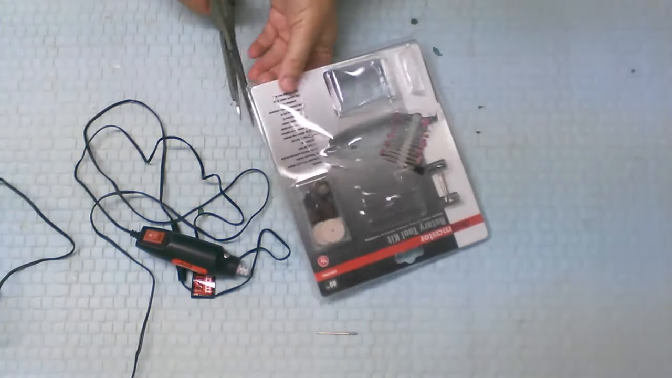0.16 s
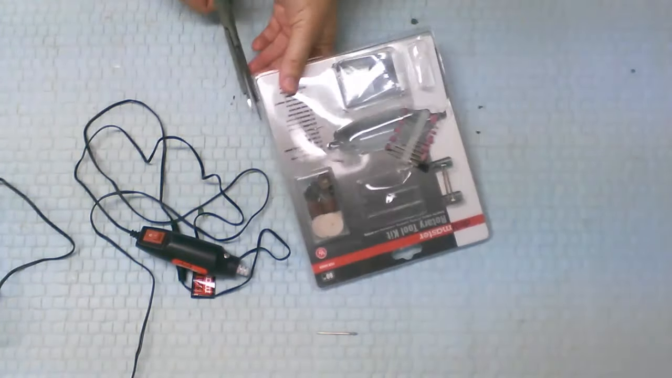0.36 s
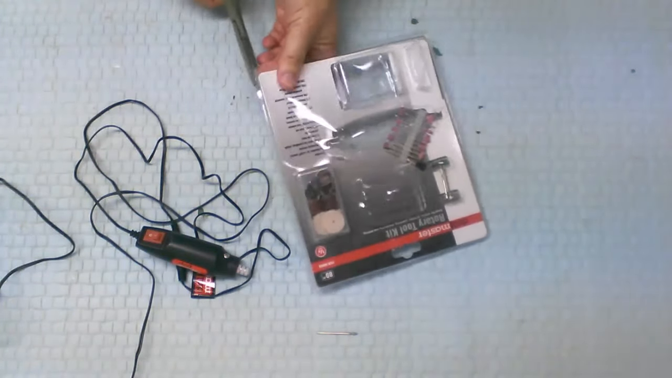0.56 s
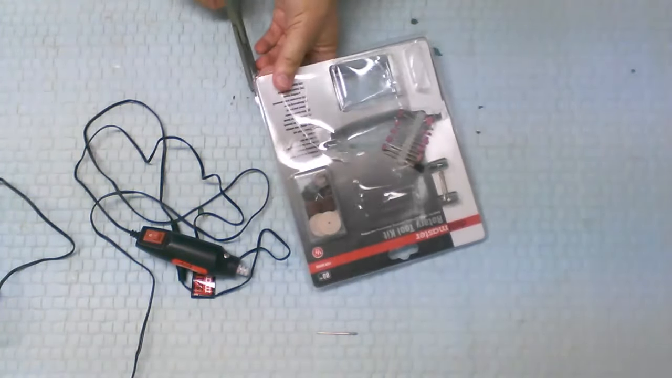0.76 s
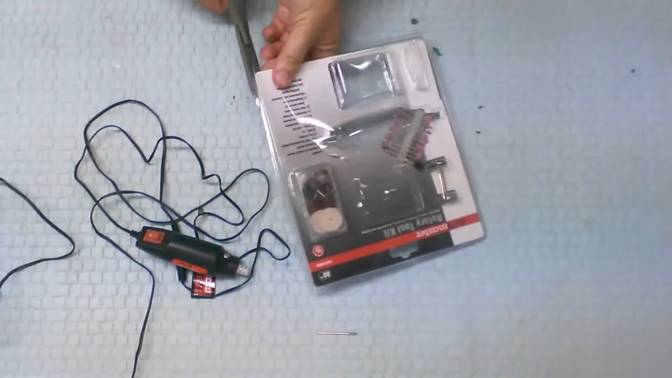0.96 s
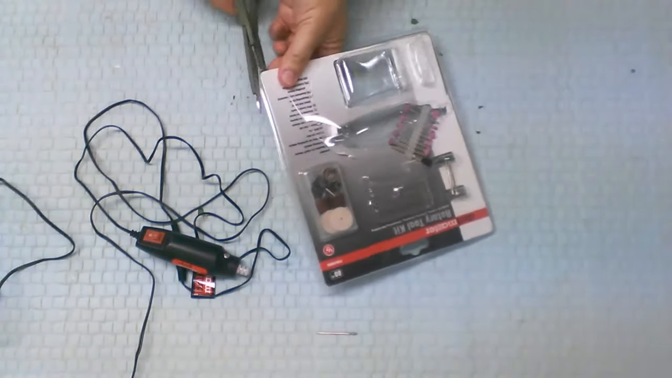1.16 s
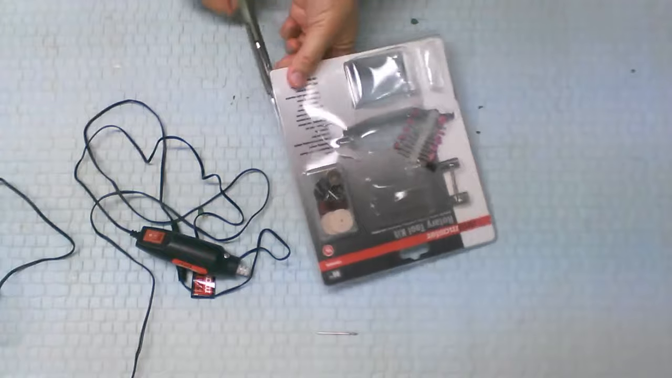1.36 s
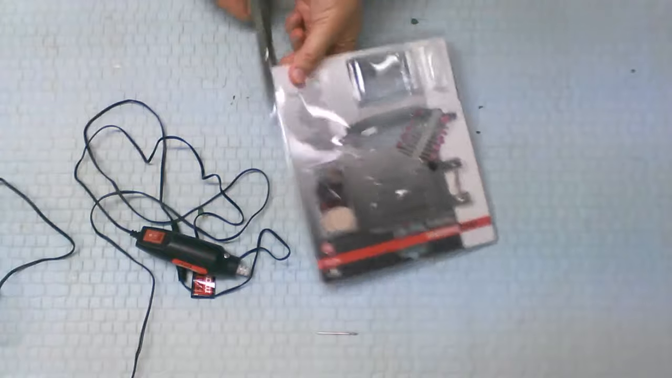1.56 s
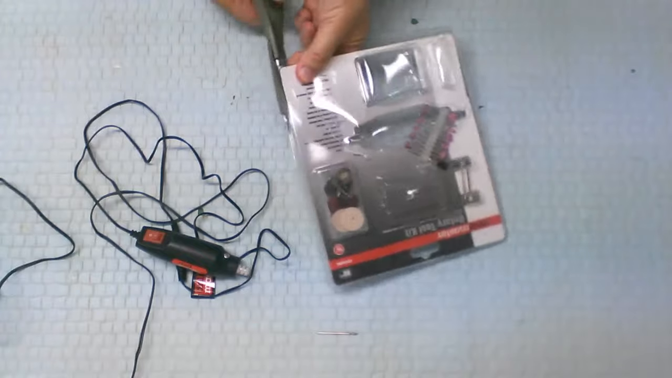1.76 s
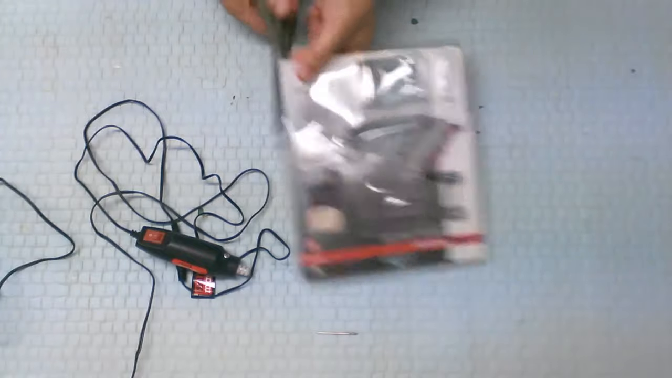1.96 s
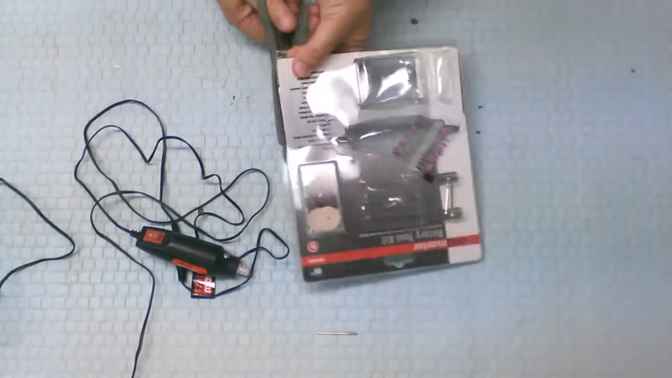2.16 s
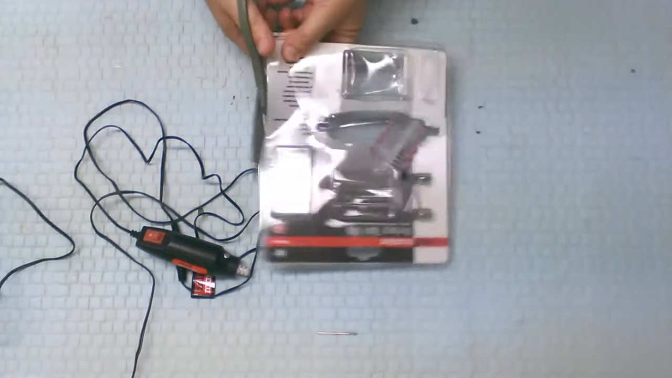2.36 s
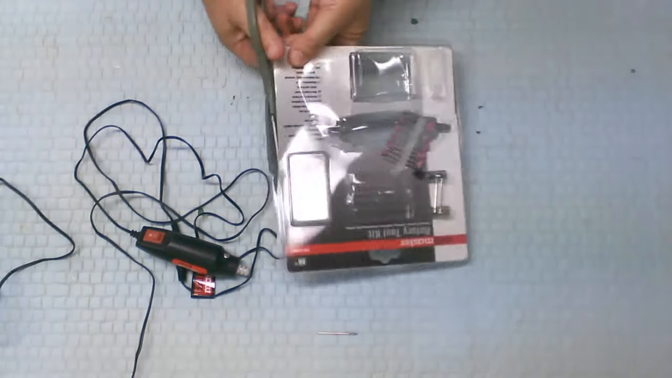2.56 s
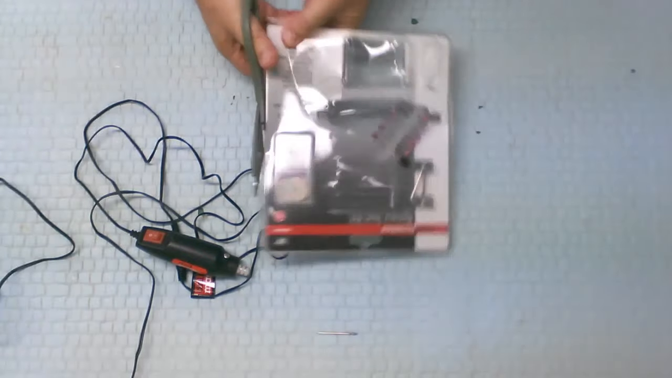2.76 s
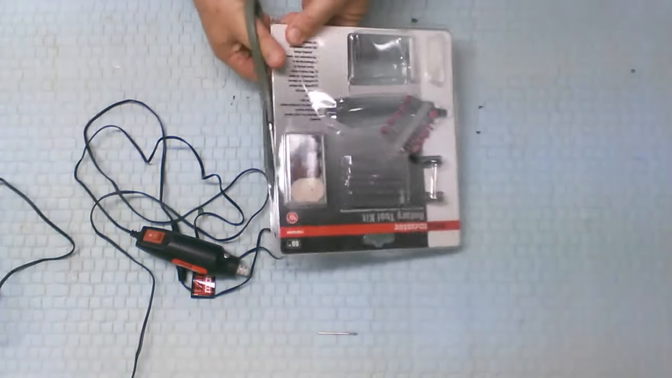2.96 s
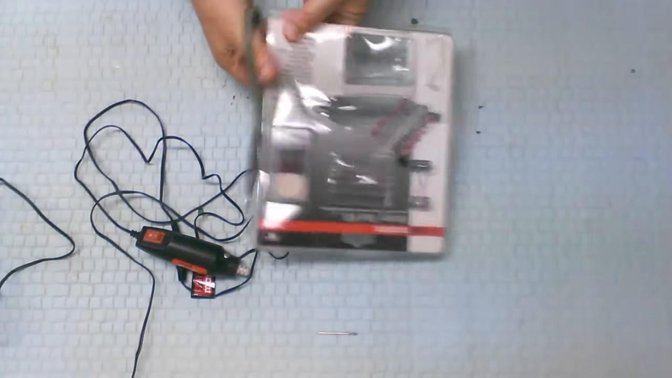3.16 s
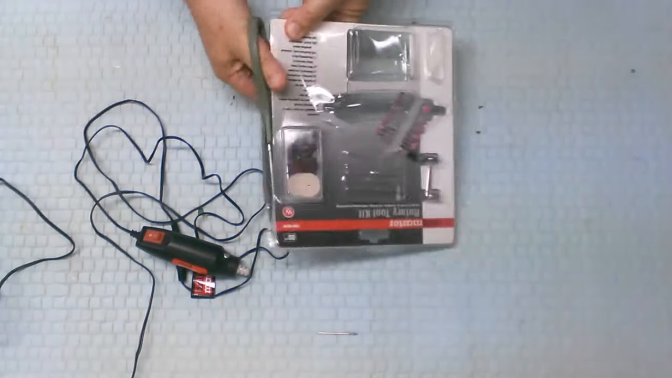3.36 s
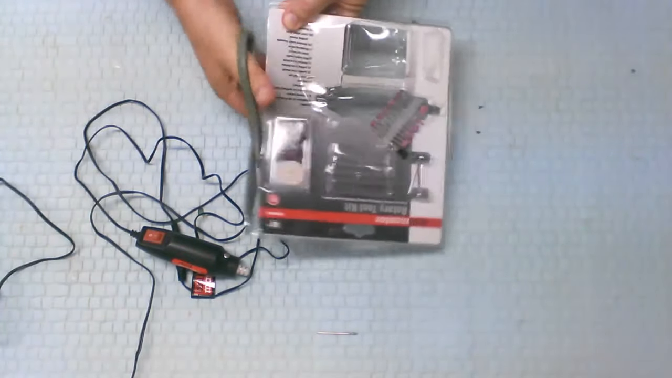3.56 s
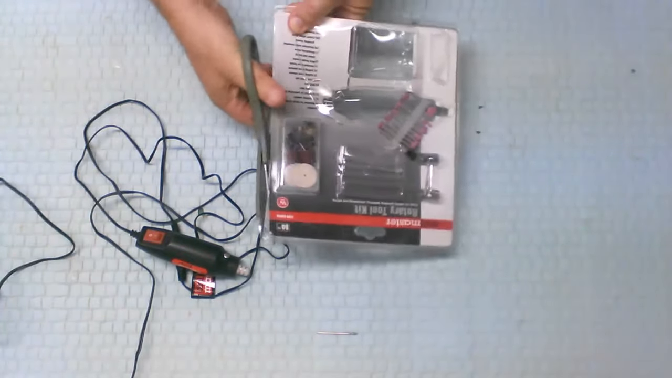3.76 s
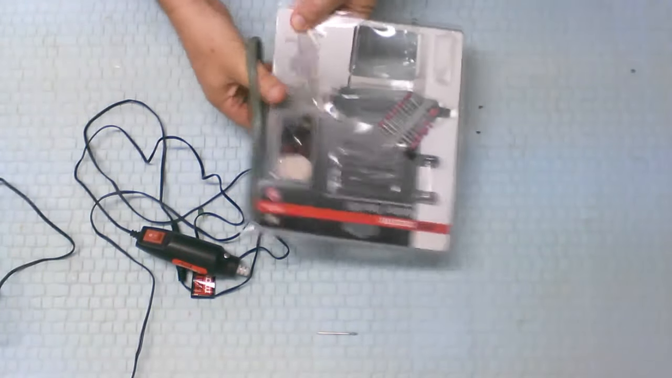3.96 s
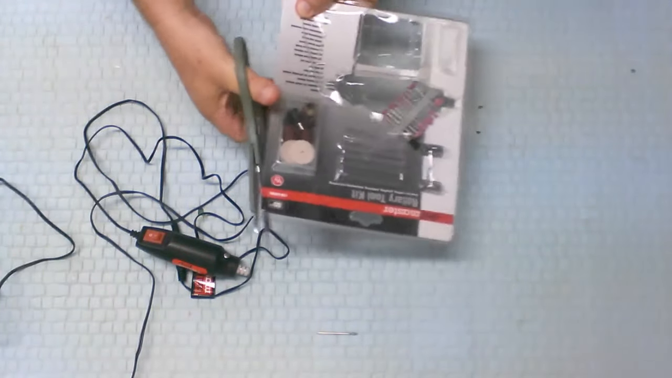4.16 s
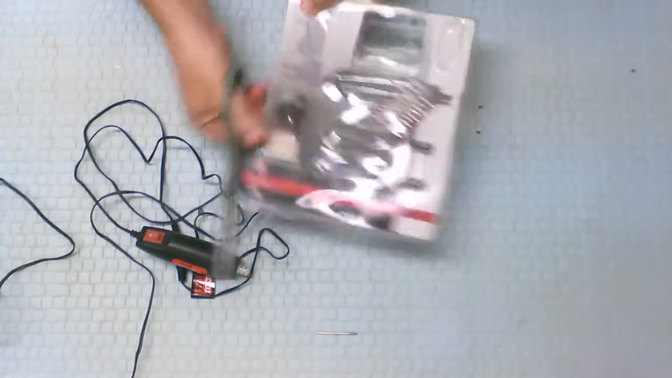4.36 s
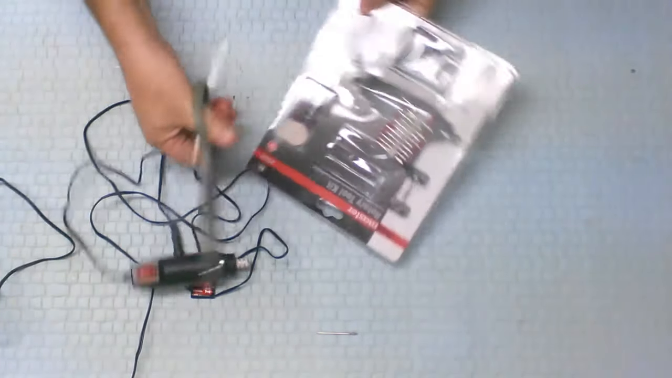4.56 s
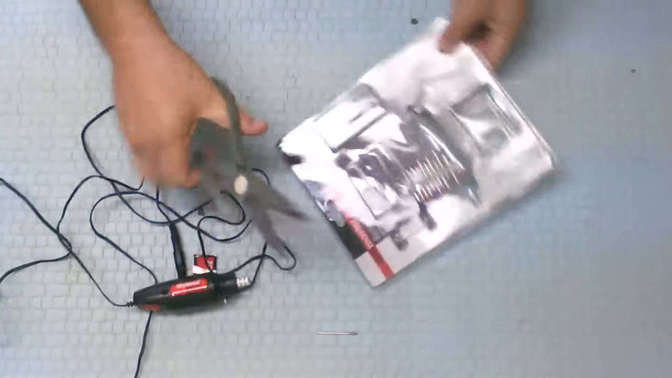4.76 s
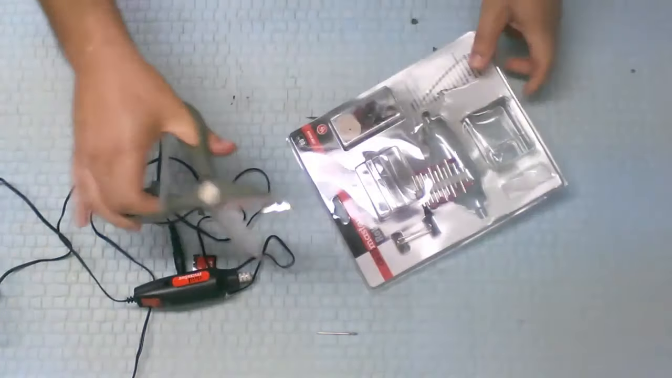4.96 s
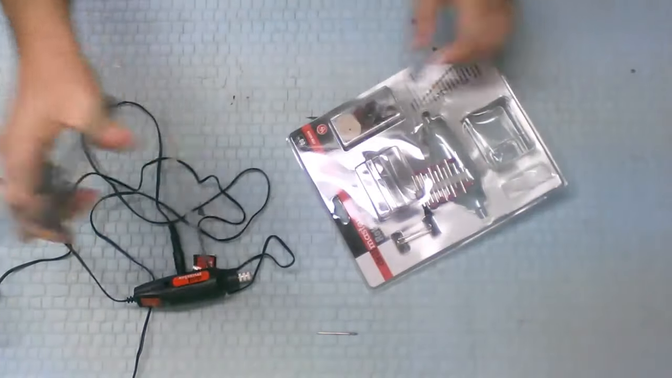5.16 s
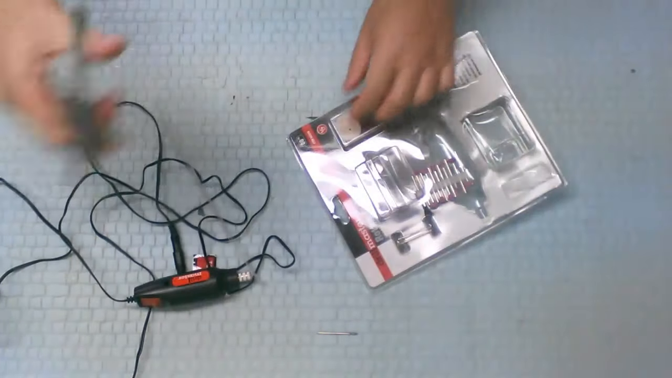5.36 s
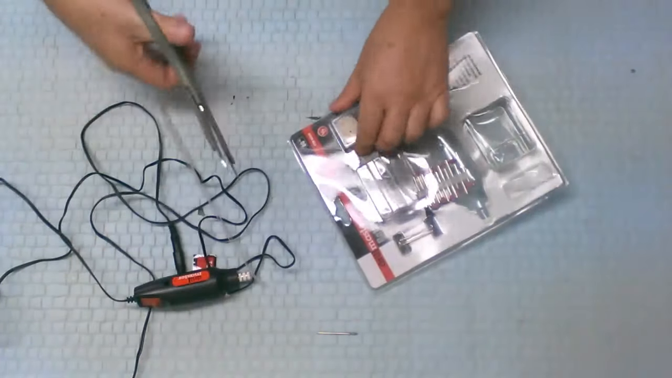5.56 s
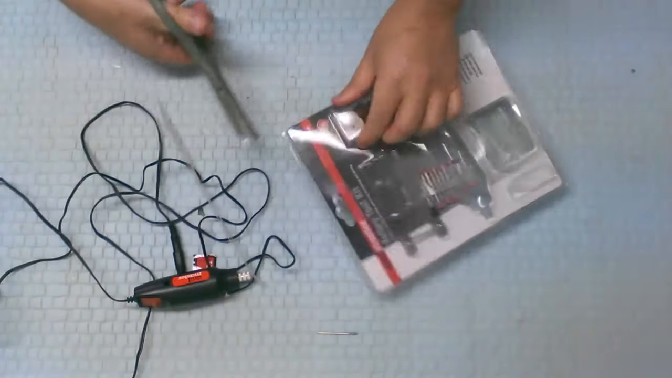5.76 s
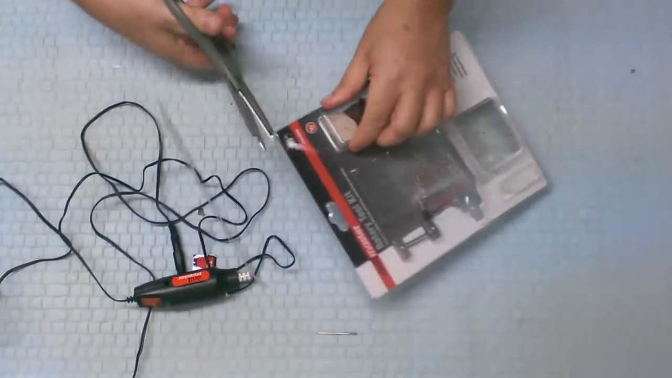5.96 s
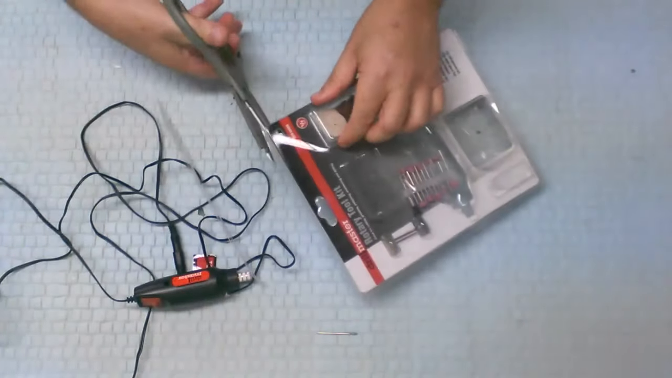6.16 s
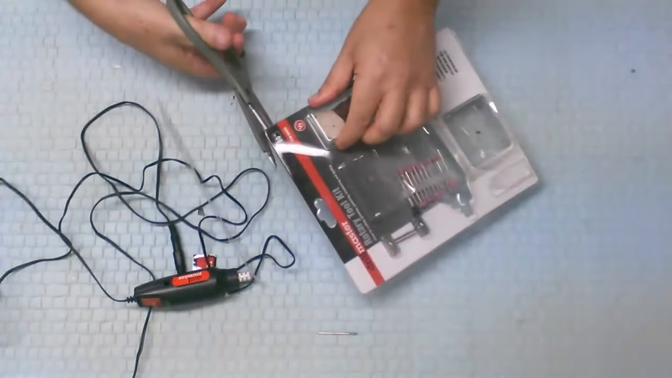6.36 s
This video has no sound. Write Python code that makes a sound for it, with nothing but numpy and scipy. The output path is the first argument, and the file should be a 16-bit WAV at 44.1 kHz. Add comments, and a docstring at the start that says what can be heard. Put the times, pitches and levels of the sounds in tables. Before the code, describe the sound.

Scissors cut stiff plastic packaging with sharp crackling snaps, crunches and rustling, then a few light knocks over faint room hum.

```python
"""Scissors cut along a stiff plastic blister pack, held over a bench in a small room.
Each squeeze of the blades tears the sheet in a run of tiny fractures; the shell buckles with sharp snaps
and rustles in the hand. The pack is put down and turned, with a few light knocks, over a faint mains hum.
Noise bursts and crackle act as forces on a resonant shell; filtered noise gives the room, the background
and a faint, thin whistling near 1 and 2.2 kHz."""
import sys
import numpy as np
from scipy import signal
from scipy.fft import rfft, irfft
from scipy.io import wavfile
from scipy.ndimage import uniform_filter1d

SR = 44100
rng = np.random.default_rng(int(sys.argv[2]) if len(sys.argv) > 2 else 0)


def inscribe(sig):
    """Save sig as 16-bit PCM at rate SR to the path in sys.argv[1].

    A 1-D sig is mono; a 2-D sig holds one channel per row.
    Samples are clipped to [-1, 1] before scaling.
    """
    pcm = np.round(np.clip(np.atleast_2d(sig).T, -1, 1) * 32767)
    wavfile.write(sys.argv[1], SR, pcm.astype(np.int16))


N = 282681  # samples in the scene
TAPS = 4096  # transform size of the shell and sweep responses
BINS = np.fft.rfftfreq(TAPS, 1 / SR)
PACK_PAN_DB = 0.5  # left minus right: the pack is held a little to the left


def gain_of(db):
    """Logarithmic level: decibels to amplitude."""
    return 10 ** (np.asarray(db) / 20)


def evened(x):
    """Normalisation of power: scales to rms 1."""
    return x / np.sqrt(np.mean(x ** 2) + 1e-20)


def read(points, hz):
    """Logarithmic pitch axis: interpolates a spectrum table along it."""
    f, value = np.transpose(points)
    return np.interp(np.log(hz + 1), np.log(f + 1), value)


def add(mix, start_s, sound, pan_db):
    """Superposition: adds a stereo sound at a time, leaning left or right by a level difference."""
    part = mix[:, max(round(start_s * SR), 0):][:, :sound.shape[1]]
    part += sound[:, :part.shape[1]] * gain_of([[pan_db / 2], [-pan_db / 2]])


def noise_pair(size, same):
    """Partial correlation: two channels of white noise that share a part of their power."""
    common, left, right = rng.standard_normal((size, 3)).T
    same = np.clip(same, 0, 1)
    return np.sqrt(same) * common + np.sqrt(1 - same) * np.array([left, right])


# steady background spectrum, relative: pitch_hz [Hz], level_db [dB per Hz]
AIR_SPECTRUM = [(25, -23.5), (60, -8.5), (115, -5), (250, -0.5), (400, -4), (700, -8.5), (1100, -13.5),
                (2500, -18), (6200, -23.5), (12200, -19.5), (14600, -22.5), (15500, -66)]
AIR_DB = -58.5  # rms over both channels
# likeness of the background in the two channels: pitch_hz [Hz], correlation [0-1]
AIR_LIKENESS = [(50, 0.3), (200, 0.12), (1000, 0.7), (4000, 0), (12000, 0)]
# mains hum: pitch_hz [Hz], level_db [dB rms]
HUM_TONES = [(119, -70), (178, -73), (240, -70.5), (360, -70)]


def background(waver_hz=5):
    """Stationary noise and frequency modulation: quiet room noise and a wavering hum."""
    hz, t = np.fft.rfftfreq(N, 1 / SR), np.arange(N) / SR
    left, other = rfft(rng.standard_normal((2, N)))
    same = np.clip(read(AIR_LIKENESS, hz), 0, 1)
    right = same * left + np.sqrt(1 - same ** 2) * other
    air = irfft(np.array([left, right]) * gain_of(read(AIR_SPECTRUM, hz)), N)
    hum = np.zeros(N)
    for pitch_hz, level_db in HUM_TONES:
        drift = evened(uniform_filter1d(rng.standard_normal(N), size=3000))
        cycles = pitch_hz * t + waver_hz * np.cumsum(drift) / SR
        hum += np.sqrt(2) * gain_of(level_db) * np.sin(2 * np.pi * cycles)
    return gain_of(AIR_DB) * evened(air) + hum


# decay of the room by band: pitch_hz [Hz], t60_s [s]
ROOM_DECAY = [(120, 0.86), (400, 0.36), (1000, 0.52), (2000, 0.43), (4000, 0.34), (8000, 0.36),
              (15000, 0.34)]
# colour of the room's answer, relative: pitch_hz [Hz], level_db [dB]
ROOM_TINT = [(100, -7.5), (400, -3), (1500, -6), (4000, -4), (8000, -5), (15000, -6.5)]


def room(x, first_s=0.0029, same=0.48):
    """Reverberation: dense reflections from bench and walls, each band dying at its own speed."""
    hz, t, bands = signal.stft(noise_pair(SR * 3 // 4, same), SR, nperseg=256)
    fall_db = -60 * t / read(ROOM_DECAY, hz)[:, None]
    bands = bands * gain_of(read(ROOM_TINT, hz)[:, None] + fall_db)
    tail = signal.istft(bands, SR, nperseg=256)[1]
    # reflections build up gradually over the first milliseconds
    tail = tail * (1 - np.exp(-(np.arange(tail.shape[1]) / SR / first_s) ** 2))
    return signal.fftconvolve(x, tail / np.linalg.norm(tail[0]), axes=1)[:, :N]


# phase between the two microphone ports: pitch_hz [Hz], left_lead_rad [radians]
PORT_LEAD = [(300, -0.42), (860, -0.21), (1900, 0.24), (4000, -1.2), (5500, 0.94), (15000, 1)]
# level difference between the ports: pitch_hz [Hz], left_minus_right_db [dB]
PORT_LEVELS = [(100, 1.5), (400, -1), (800, -0.5), (1400, -1), (2000, 2), (2800, 4), (3800, 4),
               (5000, -0.5), (8000, 0.5), (14000, 0.5)]
# gain of the left-right difference ahead of the ports: pitch_hz [Hz], gain_db [dB]
STEREO_WIDTH = [(80, 2), (300, -7.5), (1000, 2), (2000, 1), (4000, 5.5), (12000, 3.5)]


def ports(x):
    """Interchannel phase and level: the two microphone ports hear the pack differently."""
    hz = np.fft.rfftfreq(N, 1 / SR)
    left, right = rfft(x)
    mid = (left + right) / 2
    side = (left - right) / 2 * gain_of(read(STEREO_WIDTH, hz))
    # each port takes half of the difference, with opposite sign
    half = gain_of(read(PORT_LEVELS, hz) / 2) * np.exp(.5j * read(PORT_LEAD, hz))
    return irfft(np.array([(mid + side) * half, (mid - side) / half]), N)


# what the plastic shell radiates, relative: pitch_hz [Hz], level_db [dB per Hz]
SHELL_SPECTRUM = [(30, -18.5), (110, -16), (250, -8.5), (400, -4.5), (750, -6), (1200, -2.5), (1800, 0.86),
                  (2900, -4.5), (4300, -5.5), (6500, -15.5), (9500, -19.5), (14000, -28)]
# resonances of the shell and its cavities, in every sound it makes: pitch_hz [Hz], width_hz [Hz], lift_db [dB]
SHELL_RESONANCES = [(562, 80, 3.5), (653.4, 40, 5), (783, 110, 6.5), (903.5, 23, 7), (1226, 65, 7.5),
                    (1442, 43, 2), (1610, 70, 1), (1828, 110, 4), (2260, 98, 0)]


def shell(force, bass_db, treble_db, large_hz, large_db, small_hz, small_db,
          bass_hz=500, treble_hz=3500, octaves=0.24):
    """Modal resonance: a force rings the shell's fixed modes and the two panels bent at that moment."""
    db = read(SHELL_SPECTRUM, BINS)
    for pitch_hz, width_hz, lift_db in SHELL_RESONANCES:
        db = db + lift_db / (1 + (2 * (BINS - pitch_hz) / width_hz) ** 2)
    db = db + bass_db / (1 + (BINS / bass_hz) ** 2)
    db = db + treble_db / (1 + (treble_hz / (BINS + 1)) ** 3)
    for panel_hz, lift_db in (large_hz, large_db), (small_hz, small_db):
        db = db + lift_db / (1 + (np.log2((BINS + 1) / panel_hz) / octaves) ** 2)
    # minimum phase: every resonance rings after the blow, never before
    log_gain = np.log(gain_of(np.r_[db, db[-2:0:-1]]))
    ring = np.fft.ifft(np.exp(np.conj(signal.hilbert(log_gain)))).real[:TAPS // 2]
    return signal.oaconvolve(force, ring[None], axes=1)


def sweep(size, smear_s):
    """Dispersion: bending waves carry treble faster than bass, so a crack becomes a quick downward sweep."""
    # the delay is smear_s at 2 kHz and falls with the square root of pitch
    return irfft(np.exp(-4j * np.pi * smear_s * np.sqrt(2000 * BINS)))[:size]


def crackle(size, per_s, spread_db, rub, same, ping=1.0, ping_per_s=70, cycles=1.75, smear_s=0.000596):
    """Random fracture: tiny cracks of unequal size and short pings of many pitches, over rubbing hiss."""
    t = np.arange(SR // 60) / SR

    def scatter(shape, rate):
        """Random point process: repeats one shape at random moments and sizes."""
        strength = np.minimum(rng.exponential(1, size), 3)
        struck = rng.random(size) < rate / SR
        clicks = struck * gain_of(spread_db * strength) * np.sign(noise_pair(size, same))
        return signal.oaconvolve(clicks, shape[None], axes=1)[:, :size]

    cracks = scatter(sweep(len(t), smear_s), per_s)
    pings = np.zeros((2, size))
    for hz in np.geomspace(500, 12000, num=9) * rng.uniform(.85, 1.15, size=9):
        pings += scatter(hz * np.sin(2 * np.pi * hz * t) * np.exp(-hz * t / cycles), ping_per_s)
    return evened(cracks) + ping * evened(pings) + rub * noise_pair(size, same)


def squeeze(t, length_s, rise_share, release_share):
    """Smooth envelope: a level swells, holds and lets go; slow strokes swell and fade slowly."""
    span = max(length_s, .008)
    swell = 1 + np.tanh(t / (rise_share * span))
    release = 1 - np.tanh((t - span) / (release_share * span))
    return swell * release / 4


def stroke(grain, pressure, *colour):
    """Forced vibration: crackle under a swell of pressure rings the shell; rms 1 at full pressure."""
    sound = shell(grain * pressure, *colour)
    return sound / np.sqrt(np.mean(sound ** 2, 0).sum() / np.sum(pressure ** 2))


# faint, thin, whistling noise near 1 and 2.2 kHz:
# pitch_hz [Hz], width_hz [Hz], level_db [dB rms at full swell]
WHISTLE_BANDS = [(1048, 103, -65), (2250, 90, -73)]


def thin_whistle(start_s=5.15, length_s=0.42, rise_share=0.0615, release_share=0.14):
    """Narrow-band noise: two faint, fuzzy whistling bands are heard briefly."""
    hz, t = np.fft.rfftfreq(N, 1 / SR), np.arange(N) / SR
    noise = rfft(noise_pair(N, same=0.66))
    whistle = np.zeros((2, N))
    for pitch_hz, width_hz, level_db in WHISTLE_BANDS:
        band = irfft(noise / (1 + (2 * (hz - pitch_hz) / width_hz) ** 2), N)
        whistle += gain_of(level_db) * evened(band)
    return whistle * squeeze(t - start_s, length_s, rise_share, release_share)


# faint rustle while the pack is held and strained: time_s [s], level_db [dB before the layer trim]
GRIP_LEVEL = [(0, -60), (0.55, -55.5), (1.35, -54.5), (1.64, -54.5), (1.83, -38.5), (2.0, -43), (2.33, -35),
              (2.57, -35.5), (2.63, -42.5), (2.95, -46), (3.25, -53.5), (3.75, -59), (4.4, -56),
              (4.55, -28), (4.76, -40.5), (5.02, -45), (5.25, -65.5), (6.41, -67)]


def handling(trim_db=-2):
    """Friction: fingers and blades shift on the plastic, with small scattered ticks."""
    force = crackle(N, per_s=130, spread_db=4.5, rub=3.1, same=.8, ping=2.3, ping_per_s=86, cycles=1.0)
    # only the large panel stands out
    sound = shell(force, bass_db=7.5, treble_db=3.5, large_hz=1060, large_db=6.0, small_hz=2050, small_db=0)
    level_db = np.interp(np.arange(N) / SR, *np.transpose(GRIP_LEVEL))
    return evened(sound[:, :N]) * gain_of(level_db + trim_db)


# soft scrapes as blades and fingers slide along the sheet:
# start_s [s], length_s [s], level_db [dB before the layer trim], treble_db [dB]
SLIDES = [(0.055, 0.045, -49, -11), (0.365, 0.032, -38.5, -4.5), (0.418, 0.024, -36.5, -8),
          (0.625, 0.046, -35, -13), (0.966, 0.042, -40, -6), (1.451, 0.043, -36, -3),
          (1.593, 0.026, -30, -5.5), (1.707, 0.078, -27, 3.5), (1.909, 0.032, -29.5, -1),
          (2.179, 0.13, -36.5, 0), (2.963, 0.03, -26.5, -2), (3.062, 0.063, -43.5, 1),
          (3.289, 0.093, -33.5, 1.5), (3.371, 0.027, -33, -1.5), (3.489, 0.053, -43, 14.5),
          (3.65, 0.057, -33, 6), (4.119, 0.089, -31, 3.5), (4.435, 0.033, -41, 8), (4.539, 0.052, -26, 1),
          (4.781, 0.032, -34.5, -3), (4.96, 0.024, -34.5, -25), (5.002, 0.0318, -38, -31),
          (5.636, 0.078, -45, -9), (5.979, 0.058, -48, -9), (6.3, 0.065, -48, -7.5)]


def scrapes(trim_db=-1, per_s=800, spread_db=3.0, rub=1.5, same=.85, rise_share=0.19, release_share=0.33,
            bass_db=0.0, large_hz=390, large_db=5, small_hz=2600, small_db=3):
    """Sliding contact: it excites the whole shell alike; only the sharpness of the contact differs."""
    out = np.zeros((2, N))
    t = np.arange(SR // 3) / SR - .06  # room for the swell ahead of the start
    for start_s, length_s, level_db, treble_db in SLIDES:
        grain = crackle(len(t), per_s, spread_db, rub, same)
        pressure = squeeze(t, length_s, rise_share, release_share)
        sound = stroke(grain, pressure, bass_db, treble_db, large_hz, large_db, small_hz, small_db)
        add(out, start_s + t[0], sound * gain_of(level_db + trim_db), PACK_PAN_DB)
    return out


# crunches as the sheet tears or crumples: start_s [s], length_s [s], level_db [dB before the layer trim],
# bass_db [dB], treble_db [dB], large_panel_hz [Hz], small_panel_hz [Hz]
TEARS = [(0.222, 0.026, -27.5, 1.5, -11, 764, 4400), (1.131, 0.026, -27.5, 1, -6.5, 319, 421),
         (1.543, 0.027, -29, 2, 9, 742, 820), (1.673, 0.019, -19.5, -4, 18.5, 950, 4090),
         (1.749, 0.031, -17.5, -3.5, -3.5, 570, 3000), (2.099, 0.055, -20, 15.5, 12, 746, 2640),
         (2.148, 0.027, -14.5, 8, 1, 1320, 1900), (2.365, 0.024, -17.5, 4.5, 6.5, 3930, 4500),
         (2.474, 0.056, -23, 3, 3.5, 362, 1620), (2.707, 0.016, -21, -4, 3.5, 880, 1920),
         (2.873, 0.068, -23, 4.5, 6, 1020, 2540), (3.338, 0.021, -16.5, -13, -3.5, 320, 2940),
         (3.692, 0.037, -23.5, -3, 0, 320, 2210), (3.789, 0.034, -22.5, 3, 16, 1410, 3300),
         (3.956, 0.036, -17, -6, 10, 1000, 3200), (4.481, 0.026, -14, -11, 0.5, 407, 2470),
         (4.51, 0.032, -19.5, -14, 5.5, 457, 2461), (4.602, 0.039, -21, 1, -5, 654, 1780),
         (4.638, 0.034, -18, 7, 5, 1090, 1890), (4.71, 0.034, -27.5, -16, -8.5, 810, 2260)]
CRUNCH_LARGE_DB, CRUNCH_SMALL_DB = 9, 5.5  # how far the two panels stand out


def crunches(trim_db=-1, per_s=900, spread_db=2.0, rub=1.0, same=.85, rise_share=0.26, release_share=0.31):
    """Crack propagation: a tear runs through the sheet while the squeeze lasts."""
    out = np.zeros((2, N))
    t = np.arange(SR // 4) / SR - .04  # room for the swell ahead of the start
    for start_s, length_s, level_db, bass_db, treble_db, large_hz, small_hz in TEARS:
        grain = crackle(len(t), per_s, spread_db, rub, same)
        pressure = squeeze(t, length_s, rise_share, release_share)
        sound = stroke(grain, pressure, bass_db, treble_db,
                       large_hz, CRUNCH_LARGE_DB, small_hz, CRUNCH_SMALL_DB)
        add(out, start_s + t[0], sound * gain_of(level_db + trim_db), PACK_PAN_DB)
    return out


# snaps, buckles and knocks of the shell, each ringing one large and one small panel of it:
# start_s [s], level_db [dB rms over the first 15 ms, before pan and ports], bass_db [dB], treble_db [dB],
# large_panel_hz [Hz], small_panel_hz [Hz]
BUCKLES = [(0.221, -29.5, 2, -17, 420, 1130), (0.259, -35, -16, 0, 760, 1880),
           (0.502, -35.5, 7.5, 2, 690, 1630), (0.566, -44.5, -0.5, -10, 1020, 2210),
           (0.601, -35, -8, -17, 760, 5000), (0.7, -44.5, 8, -15.5, 705, 1490),
           (0.791, -17, -7, -4.5, 1510, 4100), (1.337, -47, 10, 6.5, 400, 1120),
           (1.414, -40.5, 10, -20.5, 400, 1050), (1.668, -11, 9.5, 20.5, 3870, 5300),
           (1.738, -17.5, -8, 8, 1330, 1910), (1.866, -24.5, -1.5, -17, 1320, 3620),
           (1.883, -20, 2.5, 11, 720, 4300), (1.941, -25.5, 4.5, 35.5, 3300, 3830),
           (1.952, -18, 12, 29.5, 1180, 2870), (2.027, -22, -16.5, 10.5, 1520, 2130),
           (2.082, -18.5, 1.5, 23.5, 1440, 4200), (2.107, -18.5, 14, 25, 1390, 3640),
           (2.2125, -34.5, -2, -5, 2100, 2300), (2.2256, -29.5, 2, 3, 2290, 2700),
           (2.244, -34.5, -2, -15, 1800, 2200), (2.269, -26, 7.5, 20.5, 1150, 1620),
           (2.362, -21, 7.5, 15.5, 1320, 4300), (2.401, -28.5, -4, 14, 770, 3790),
           (2.547, -30.5, 6, -12.5, 2400, 2600), (2.571, -29, 0, 2, 1830, 4140),
           (2.6593, -22.5, 1, 20.5, 880, 1730), (2.687, -16.5, -11.5, 5, 814, 1710),
           (2.772, -29, -4.5, 17, 905, 4350), (2.789, -32, -6.5, 9.5, 1130, 1450),
           (2.8573, -20, -8, 6, 840, 1170), (2.9213, -23, -9.5, 6, 2020, 2540),
           (2.9356, -17.5, -24, -22, 884, 1140), (3.011, -27, -6, -35, 543, 1000),
           (3.156, -44.5, 24, 26, 1036, 1190), (3.298, -34.5, -5.5, 3, 553, 2970),
           (3.335, -22.5, -6, 0.5, 343, 2480), (3.487, -33.5, 3, -1, 1320, 2620),
           (3.527, -36, 8.5, -6, 1190, 2070), (3.571, -46, -1, 8, 600, 1900),
           (3.661, -30.5, -13.5, -9.5, 318, 1980), (3.692, -23.5, -17.5, 5, 2380, 2830),
           (3.781, -30, 0.5, 16, 1400, 3120), (3.811, -22, -16.5, 9, 1430, 4070),
           (3.822, -23.5, 4, 16, 1340, 4500), (3.9423, -32, 11.5, 13, 3300, 4360),
           (4.05, -38, 8.5, 9, 1500, 1790), (4.293, -38.5, -10, 25.5, 1420, 1840),
           (4.3824, -48, 6.5, 12, 1800, 2950), (4.480, -17, 2.5, 20.5, 384, 1620),
           (4.521, -26, 15, 0.5, 890, 2370), (4.58, -28, -3.5, -12.5, 1000, 1890),
           (4.654, -25.5, 2.5, -2, 1200, 2370), (4.861, -18, -0.5, -7, 443, 3800),
           (5.072, -28.5, -4.5, -12, 323, 2390), (5.346, -58.5, 10, 21, 1110, 2380),
           (5.393, -43.5, 25, 30, 1757, 2677), (5.623, -31, 2, -13, 730, 2510),
           (5.795, -31, 0.5, -2.5, 780, 1540)]
SNAP_LARGE_DB, SNAP_SMALL_DB = 12.5, 10.5  # panel lifts at a panel share of 1
# harder snaps break cleanly and flutter for less time
SNAP_T60_S, SNAP_MIDDLING_DB, SNAP_SHORTER_PER_DB = 0.035, -20.5, 0.015


def snaps(panel_share, flutter=1.92, same=0.58, smear_s=0.0005214, rise_s=0.00035,
          slow_hz=900, slow_stretch=2.15):
    """Buckling instability: the sheet gives way at once, then flutters; slow bending outlasts the fast."""
    out, t = np.zeros((2, N)), np.arange(SR // 6) / SR
    lowpass = signal.butter(2, slow_hz, fs=SR)
    large_db, small_db = panel_share * SNAP_LARGE_DB, panel_share * SNAP_SMALL_DB
    for start_s, level_db, bass_db, treble_db, large_hz, small_hz in BUCKLES:
        t60 = SNAP_T60_S * np.exp(SNAP_SHORTER_PER_DB * (SNAP_MIDDLING_DB - level_db))
        fall_db = -60 * t / t60
        noise = noise_pair(len(t), same) * (1 - np.exp(-t / rise_s))
        slow = signal.filtfilt(*lowpass, noise, padtype=None)
        force = (noise - slow) * gain_of(fall_db) + slow * gain_of(fall_db / slow_stretch)
        force = flutter * force / np.linalg.norm(force[0])
        force[:, :TAPS // 2] += sweep(TAPS // 2, smear_s)  # the first break
        sound = shell(force, bass_db, treble_db, large_hz, large_db, small_hz, small_db)
        early_rms = np.sqrt(np.mean(sound[:, :round(.015 * SR)] ** 2))
        add(out, start_s, sound / early_rms * gain_of(level_db), PACK_PAN_DB)
    return out


def scene(room_db=-12):
    """Direct and reverberant fields: the pack close to the microphone, the room behind it."""
    crackling = crunches() + scrapes() + handling()
    # a panel beams its ring one way, so the room hears a smaller share of its lift
    direct = snaps(panel_share=0.83) + crackling
    reflected = room(snaps(panel_share=0.43) + crackling)
    return ports(direct + gain_of(room_db) * reflected) + thin_whistle() + background()


def record(dry, edge_hz=15900):
    """Saturation and band limit: the loudest peaks are rounded off, then the top is cut."""
    rounded = np.tanh(dry)
    lowpass = signal.firwin(255, edge_hz, window=("kaiser", 9), fs=SR)
    return signal.oaconvolve(rounded, lowpass[None], "same")


dry = scene()
out = record(dry)
inscribe(out)
```